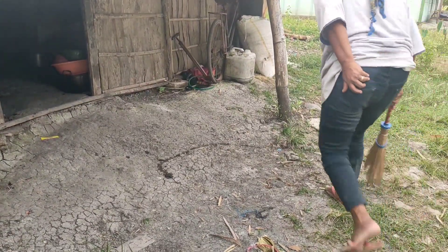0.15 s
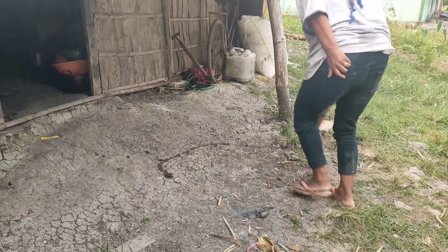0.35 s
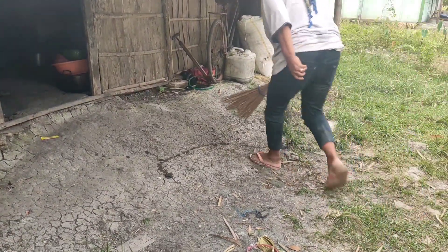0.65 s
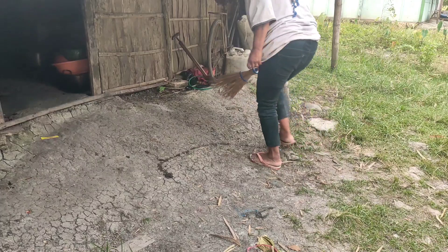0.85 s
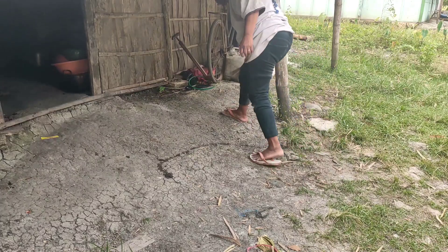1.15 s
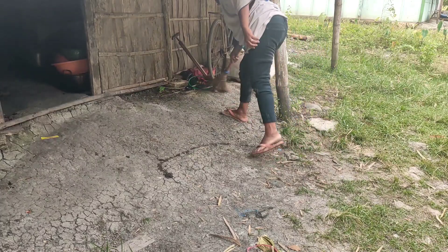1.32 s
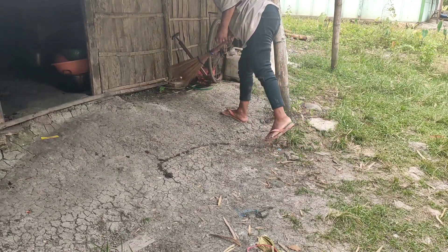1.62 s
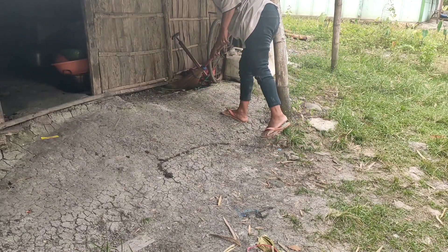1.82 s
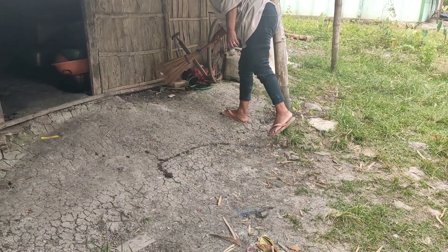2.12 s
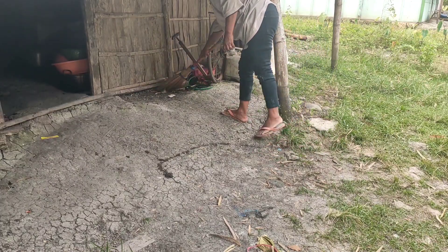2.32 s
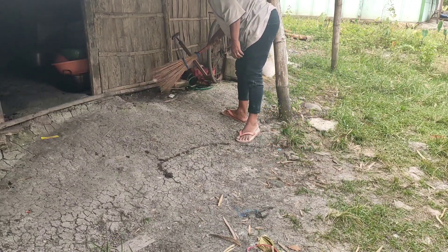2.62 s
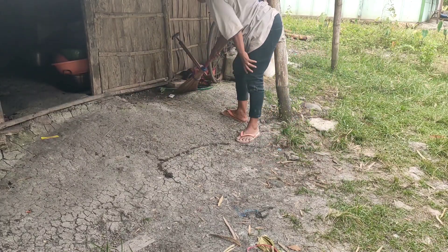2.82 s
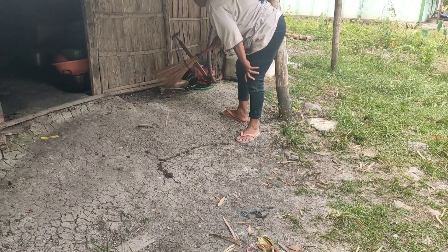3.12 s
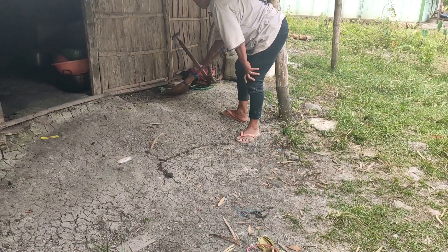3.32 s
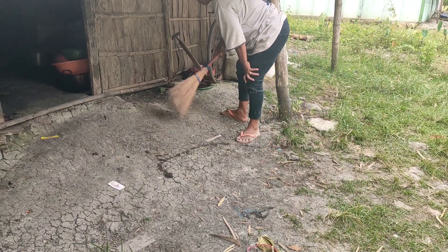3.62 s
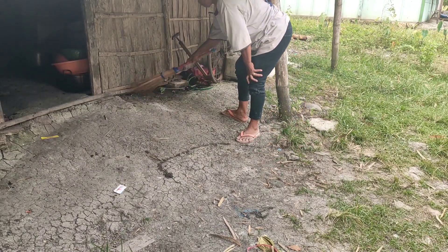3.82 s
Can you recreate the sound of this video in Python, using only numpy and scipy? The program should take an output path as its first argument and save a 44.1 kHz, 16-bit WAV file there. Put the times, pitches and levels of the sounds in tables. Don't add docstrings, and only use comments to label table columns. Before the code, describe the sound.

Sandals slap and scuff on dirt while small birds chirp, then a stiff broom makes five evenly spaced gritty strokes near the microphone, knocking a plank once, in an open yard with faint wind.

```python
import sys
import numpy as np
from scipy import signal
from scipy.fft import rfft, irfft
from scipy.io import wavfile
from scipy.ndimage import uniform_filter1d

SR = 44100
rng = np.random.default_rng(int(sys.argv[2]) if len(sys.argv) > 2 else 0)


def transcribe(signal):
    frames = np.atleast_2d(signal).T
    limited = np.clip(frames, -1, 1)
    pcm = np.round(limited * 32767).astype(np.int16)
    wavfile.write(sys.argv[1], SR, pcm)


def voltage_ratio(level):
    return 10 ** (np.asarray(level, float) / 20)


N = 174195


def evened(x):
    return x / np.sqrt(np.mean(x ** 2) + 1e-20)


def read(points, hz):
    f, value = np.transpose(points)
    return np.interp(np.log(hz + 1), np.log(f + 1), value)


def add(mix, s, sound):
    part = mix[round(s * SR):][:len(sound)]
    part += sound[:len(part)]


def slow(per_s):
    t = np.arange(N // 64 + 2) * 64 / SR
    rates = np.geomspace(per_s / 8, per_s, 20)
    drift = sum(np.sin(2 * np.pi * (f * t + rng.random())) / np.sqrt(f) for f in rates)
    return np.interp(np.arange(N) / SR, t, evened(drift))


def spread(a, b, colour, same, patchy_db, lean=((1, 0), (2, 0)), late_s=0):
    hz, _, z = signal.stft(np.array([a, b]), SR, nperseg=512, noverlap=384)
    shared = np.clip(read(same, hz), -1, 1)[:, None]
    patches = uniform_filter1d(rng.standard_normal(z.shape[1:]), 4, axis=0)
    patches = evened(uniform_filter1d(patches, 14, axis=1))
    tilt = voltage_ratio(read(lean, hz) / 2)[:, None]
    delay = np.exp(-2j * np.pi * hz * late_s)[:, None]
    left = z[0] * tilt
    right = (shared * z[0] + np.sqrt(1 - shared ** 2) * z[1]) / tilt * delay
    gain = voltage_ratio(read(colour, hz)[:, None] + patchy_db * patches)
    pair = signal.istft(np.array([left, right]) * gain, SR, nperseg=512, noverlap=384)[1]
    return evened(pair[:, :N])


def yard():
    # frequency in Hz, level in dB per Hz.
    colour = [(200, -4), (350, -8.5), (900, -14), (3800, -5.5), (5200, -12), (8200, -20), (10500, -20.5),
              (12000, -31), (15700, -28)]
    # frequency in Hz, left-right likeness from 0 to 1.
    likeness = [(60, 0.55), (180, 0.71), (550, 0.32), (1650, 0.01), (4970, 0.087), (15000, 0.01)]
    level = voltage_ratio(-50 + 0.51 * slow(4.14))
    return level * spread(*rng.standard_normal((2, N)), colour, likeness, 2.9)


def wind():
    # frequency in Hz, level in dB per Hz.
    colour = [(8.8, -47), (15, -1), (81, -7), (124, -12.5), (201, -1.5), (280, -21.5), (400, -16.5),
              (520, -48), (880, -120)]
    hz = np.fft.rfftfreq(N, 1 / SR)
    a, b = irfft(rfft(rng.standard_normal((2, N))) * voltage_ratio(read(colour, hz)) * (hz > 12), N)
    gap = 0.14
    level_db = -64.5 + 6.5 * np.arange(N) / N + 2.5 * slow(9.2)
    return voltage_ratio(level_db) * evened(np.array([a + gap * b, a - gap * b]))


def buffet():
    # time in seconds, level in dB.
    pushes = [(0, -67), (1.3, -78), (1.8, -59.5), (2.7, -69), (3.05, -53), (3.45, -44.5), (3.7, -80),
              (3.95, -72)]
    hz = np.fft.rfftfreq(N, 1 / SR)
    z = rfft(rng.standard_normal((2, N))) * np.exp(-((hz - 28.) / 38.0) ** 2)
    level_db = np.interp(np.arange(N) / SR, *np.transpose(pushes))
    return voltage_ratio(level_db) * evened(irfft(z, N))


def waver_tone(t, pitch, db, edge, drift, waver, flutter_db):
    wobble, flutter = (drift[k:][:len(t)] for k in rng.integers(0, N // 2, size=2))
    phase = 2 * np.pi * np.cumsum(pitch * (1 + waver * wobble)) / SR
    return np.sqrt(2) * voltage_ratio(db + flutter_db * flutter) * edge * np.sin(phase)


def glides(rows, edge_s, waver, flutter_db, per_s):
    out, drift = np.zeros(N), slow(per_s)
    for s, length, from_hz, to_hz, db in rows:
        t = np.arange(0, length + edge_s, 1 / SR)
        pitch = from_hz + (to_hz - from_hz) * np.sin(np.pi / 2 * np.minimum(t / length, 1)) ** 2
        edge = np.clip(np.minimum(t, length + edge_s - t) / edge_s, 0, 1)
        add(out, s, waver_tone(t, pitch, db, edge, drift, waver, flutter_db))
    return out


def thrums():
    # start in seconds, length in seconds, from Hz, to Hz, level in dB.
    gusts = [
        (0, 0.1, 81, 74, -55),
        (1.45, 0.087, 100, 86.4, -50),
        (1.61, 0.048, 81, 75.5, -56.5),
        (1.71, 0.062, 93, 79, -52),
        (1.775, 0.039, 77.5, 64, -42),
        (3.14, 0.046, 102, 88, -43.5),
        (3.2, 0.083, 78.5, 65, -48.5),
        (3.36, 0.1, 79, 99, -49),
        (3.48, 0.086, 90, 71.6, -46.5),
    ]
    return glides(gusts, 0.014, waver=0.014, flutter_db=0.5, per_s=50.0)


def whistles():
    # start in seconds, length in seconds, from Hz, to Hz, level in dB.
    notes_sung = [
        (.265, .035, 4500, 3800, -56),
        (.443, 0.0098, 2190, 2630, -54),
        (.572, 0.016, 2960, 2170, -70),
        (.79, .011, 2770, 2020, -43),
        (1.125, 0.019, 2840, 3370, -50.5),
        (1.13, .022, 2300, 1960, -53),
        (1.275, .026, 3250, 3810, -54.5),
        (1.303, 0.024, 3590, 4030, -53),
        (2.335, 0.012, 2600, 2050, -49),
        (3.92, 0.018, 4020, 4100, -46.5),
    ]
    return glides(notes_sung, 0.0019, waver=0.0045, flutter_db=2.5, per_s=37.0)


def phrases():
    # time in seconds, pitch in Hz, level in dB.
    songs = [
        [(.325, 4300, -56), (.338, 3650, -51), (.348, 3330, -44), (.361, 3260, -46), (.375, 4100, -52)],
        [(.465, 4500, -56), (.485, 4130, -51), (.55, 4030, -52), (.615, 3930, -52), (.635, 3900, -61),
         (.75, 4100, -61)],
        [(.452, 3200, -58), (.47, 3750, -54), (.6, 3650, -56), (.63, 3630, -49), (.69, 3650, -47),
         (.75, 3800, -49), (.78, 3700, -47), (.795, 3480, -49), (.807, 3050, -54)],
        [(.585, 3420, -54), (.65, 3280, -53), (.67, 3120, -53), (.686, 2800, -56)],
        [(.98, 3950, -60), (1.05, 3920, -57), (1.11, 3880, -60), (1.15, 3800, -62)],
        [(.975, 3570, -52), (1.04, 3600, -47), (1.08, 3680, -50), (1.115, 3700, -50), (1.145, 3600, -60)],
        [(1.066, 2450, -51), (1.074, 2950, -47), (1.082, 3200, -46), (1.092, 2980, -49), (1.104, 2730, -47),
         (1.115, 2780, -49), (1.124, 3600, -55)],
        [(2.15, 4050, -48), (2.21, 3930, -46), (2.295, 3794, -47), (2.345, 3360, -50)],
    ]
    out, drift = np.zeros(N), slow(70.)
    edge_s = 0.0027
    for rows in songs:
        s, hz, db = np.transpose(rows)
        t = np.arange(s[0], s[-1], 1 / SR)
        pitch = uniform_filter1d(np.interp(t, s, hz), size=200, mode="nearest")
        edge = np.clip(np.minimum(t - s[0], s[-1] - t) / edge_s, 0, 1)
        tone = waver_tone(t, pitch, np.interp(t, s, db), edge, drift, waver=0.0077, flutter_db=3.5)
        add(out, s[0], tone)
    return out


def echoes(x):
    t = np.arange(6000) / SR
    t60 = 0.092
    hit = (rng.random((2, 6000)) < .04) * (t > .002)
    taps = rng.standard_normal((2, 6000)) * hit * voltage_ratio(-60 * t / t60)
    return voltage_ratio(-5.5) * signal.fftconvolve(x, taps / np.linalg.norm(taps[0]), axes=1)[:, :N]


def plank():
    # start in seconds, mode in Hz, level in dB, t60 in seconds.
    knocks = [(2.403, 607, -38, 0.066), (2.408, 208, -42, 0.072), (2.41, 854, -40, .04),
              (2.415, 1085, -33, .04), (2.422, 760, -33, 0.037), (2.424, 1137, -37, 0.058),
              (2.428, 546, -28.5, 0.056), (2.442, 423, -44.5, 0.099), (2.444, 224, -34, 0.1),
              (2.472, 196, -34, 0.091), (2.499, 228, -33.5, 0.077), (2.53, 437, -37, 0.042),
              (2.597, 725, -34, 0.037), (2.601, 353, -32.5, 0.032)]
    out, t = np.zeros(N), np.arange(6000) / SR
    rise_s = 0.0021
    for s, hz, db, t60 in knocks:
        add(out, s, voltage_ratio(db - 60 * t / t60) * (1 - np.exp(-t / rise_s)) * np.sin(2 * np.pi * hz * t))
    return out


def sandals():
    # start in seconds, click level in dB, click pitch in Hz, thud level in dB, rattle level in dB.
    slaps = [(.3725, -44, 3400, -60, -46), (.3784, -28.5, 2300, -28, -47), (.3797, -35, 750, -45, -60),
             (.3855, -48, 6000, -50, -48), (.8638, -13.5, 1750, -27, -46), (.8657, -27, 2300, -40, -44),
             (.8705, -32, 800, -34, -40), (.8738, -30, 3300, -50, -43), (1.199, -44, 1200, -43, -58),
             (1.288, -48, 1000, -35, -54), (1.2985, -39, 1500, -46, -50), (2.4268, -29, 950, -45, -55),
             (2.861, -37, 4200, -60, -60), (2.875, -40, 1500, -46, -62), (2.929, -33, 4500, -60, -50),
             (3.3985, -34, 3200, -60, -46)]
    click_s, crack_s, thud_s, rattle_t60 = .0015, .0015, 0.0019, 0.067
    out, t = np.zeros(N), np.arange(4000) / SR
    grit_band = signal.butter(2, [500, 4200], "band", fs=SR, output="sos")
    for s, click_db, hz, thud_db, rattle_db in slaps:
        wave = np.sin(2 * np.pi * hz * t) - .25 * np.cos(4.2 * np.pi * hz * t)
        click = -wave * np.sin(np.pi * np.minimum(t / click_s, 1))
        thud = np.sin(2 * np.pi * 342 * t) * np.exp(-t / thud_s)
        grit = rng.standard_normal(4000) * (0.37 + (rng.random(4000) < .03) * 2.6)
        grit = evened(signal.sosfilt(grit_band, grit))
        crack = signal.lfilter([0.22, 0.25, -0.095, -0.11], 1, rng.standard_normal(4000))
        crack = voltage_ratio(-23) * crack * np.exp(-t / crack_s)
        rattle = voltage_ratio(rattle_db - 60 * t / rattle_t60) * grit
        add(out, s, voltage_ratio(click_db) * (click + crack) + voltage_ratio(thud_db) * thud + rattle)
    return out


def ticks(per_s, size_db):
    size = voltage_ratio(size_db * np.minimum(rng.exponential(1, (2, N)), 5)) * rng.standard_normal((2, N))
    return size * (rng.random((2, N)) < per_s / SR)


def stroke(start, rise, hold, release):
    t = np.arange(N) / SR - start
    up = np.sin(np.pi / 2 * np.clip(t / rise, 0, 1)) ** 2
    return up * np.exp(-2 * (np.maximum(t - rise - hold, 0) / release) ** 2)


def broom():
    # start, rise, hold and release in seconds, level in dB.
    sweeps = [
        (1.425, 0.098, 0.066, 0.15, -26.5),
        (1.959, 0.082, 0.038, 0.11, -25),
        (2.416, 0.12, 0.074, 0.099, -26),
        (2.943, 0.14, 0.03, 0.078, -25.5),
        (3.429, 0.14, 0.11, 0.1, -24),
    ]
    # start, rise, hold and release in seconds, level in dB.
    bites = [
        (1.53, 0.016, 0.018, 0.049, -40),
        (2.019, 0.0092, 0.0073, 0.018, -49.5),
        (2.123, 0.021, 0.011, 0.04, -34.5),
        (2.48, 0.021, 0.0042, 0.013, -52),
        (2.592, 0.021, 0.013, 0.031, -33.5),
        (3.026, 0.019, .01, 0.031, -41),
        (3.09, .01, 0.0092, 0.018, -48),
        (3.502, 0.014, 0.0074, 0.012, -41),
        (3.64, 0.011, 0.0063, 0.011, -49),
    ]
    # start, rise, hold and release in seconds, level in dB.
    landings = [(.002, 0.009, 0.069, 0.025, -78), (0.077, 0.026, 0.019, 0.077, -45.5),
                (0.2, 0.016, 0.066, 0.02, -54), (1.884, 0.048, 0.027, 0.047, -33),
                (2.385, 0.02, 0.022, 0.053, -31), (2.836, 0.012, 0.057, 0.038, -50),
                (2.928, .003, .001, .004, -36), (2.931, .002, .006, .008, -42),
                (3.232, 0.012, 0.018, 0.04, -42), (3.394, 0.0052, 0.0064, 0.033, -38),
                (3.427, 0.017, 0.024, 0.04, -46), (3.884, 0.016, 0.013, 0.02, -48)]
    # frequency in Hz, level in dB per Hz.
    scrape_colour = [(180, -58), (300, -32.5), (1110, -21.5), (2230, -5.5), (3310, -7), (3980, -2.5),
                     (8380, -13.5), (14500, -19), (15700, -11.5)]
    land_colour = [(180, -24.5), (300, -18), (810, -19.5), (1470, -13.5), (4250, -6), (7580, -14),
                   (12500, -21.5), (15700, -20.5)]
    # frequency in Hz, left-right likeness from 0 to 1.
    likeness = [(60, 0.85), (300, 0.66), (1500, 0.65), (5000, 0.094), (15000, 0.15)]
    # frequency in Hz, left minus right in dB.
    side_lean = [(60, -5), (240, 2.5), (950, 1), (3770, 0.5), (15000, 2.5)]
    late_s = 6e-5

    t = np.arange(N) / SR
    sweep = sum(voltage_ratio(db) * stroke(s, r, h, f) for s, r, h, f, db in [*sweeps, *bites])
    sweep = sweep * voltage_ratio(.8 * slow(30.))
    land = sum(voltage_ratio(db) * stroke(s, r, h, f) for s, r, h, f, db in landings)
    roll = 0
    for s, r, h, f, db in sweeps:
        since = np.maximum(t - s - r - h - f / 2, 0)
        roll = roll + stroke(s, r + h, 9, 1) * voltage_ratio(db - 10 - 85 * since)
    roll = roll * voltage_ratio(1.66 * slow(40.))

    scrape = spread(*ticks(14000., size_db=0.7), scrape_colour, likeness, 1.38, side_lean, late_s)
    body = signal.sosfiltfilt(signal.butter(2, 2840, fs=SR, output="sos"), scrape)
    pressure = np.max([stroke(*row[:4]) for row in sweeps], axis=0)
    scrape = scrape - (1 - pressure ** 0.59) * body
    landing = spread(*ticks(9000., size_db=2.0), land_colour, likeness, 1.9, side_lean, late_s)
    grit = spread(*ticks(3000., size_db=-1.0), land_colour, likeness, 3.8, side_lean, late_s)
    return sweep * scrape + land * landing + roll * grit


def scene():
    near = (sandals() + plank()) * voltage_ratio([[.6], [-.6]])
    birds = (phrases() + whistles()) * voltage_ratio([[-1.5], [-2.]])
    returns = echoes(near + voltage_ratio(-2) * birds)
    air = yard() + wind() + buffet() + thrums()
    return air + birds + returns + near + broom()


def low_pass(x):
    return signal.sosfilt(signal.butter(12, 15870, fs=SR, output="sos"), x)


def record(dry):
    # frequency in Hz, strip level against its neighbours in dB below which it is dropped.
    mask = [(1200, -30), (2600, -3), (5000, -.6), (15000, .6)]
    hz, _, z = signal.stft(dry, SR, nperseg=2048, noverlap=1536)
    dip = 1 - .6 * np.exp(-((hz - 8050) / 220) ** 2)
    colour = dip * (hz < 15450)
    level_db = uniform_filter1d(20 * np.log10(abs(z).mean(0) + 1e-9), size=3, axis=1)
    strip = uniform_filter1d(level_db, size=3, axis=0)
    around = uniform_filter1d(level_db, size=71, axis=0)
    holes = voltage_ratio(-24 * (strip < around + read(mask, hz)[:, None]))
    clean = signal.istft(z * holes * colour[:, None], SR, nperseg=2048, noverlap=1536)[1][:, :N]
    return low_pass(clean)


dry = scene()
out = record(dry)
transcribe(out)
```